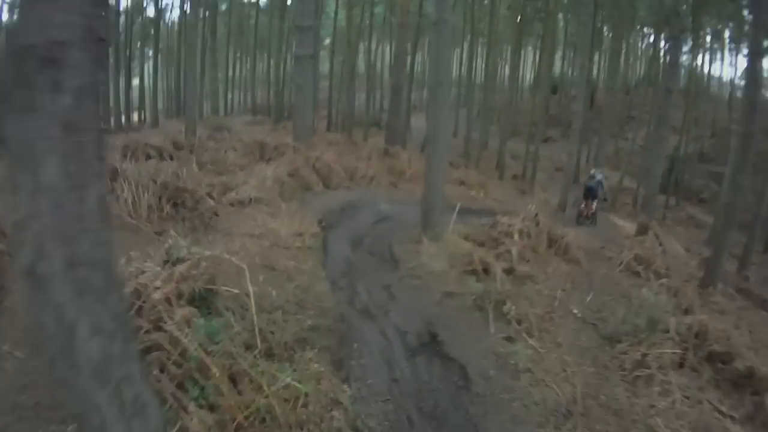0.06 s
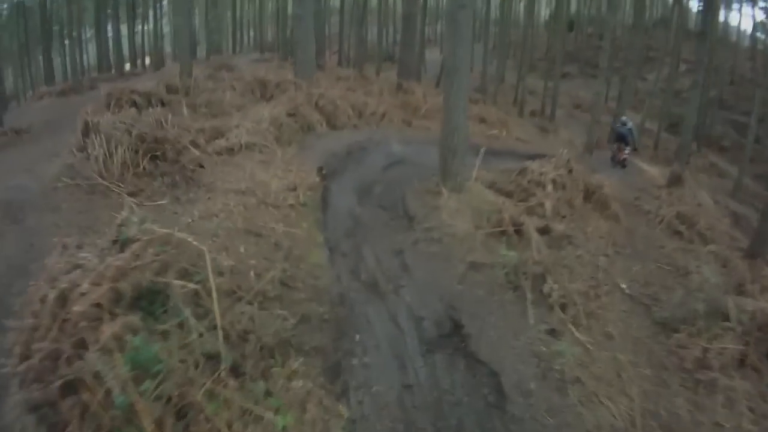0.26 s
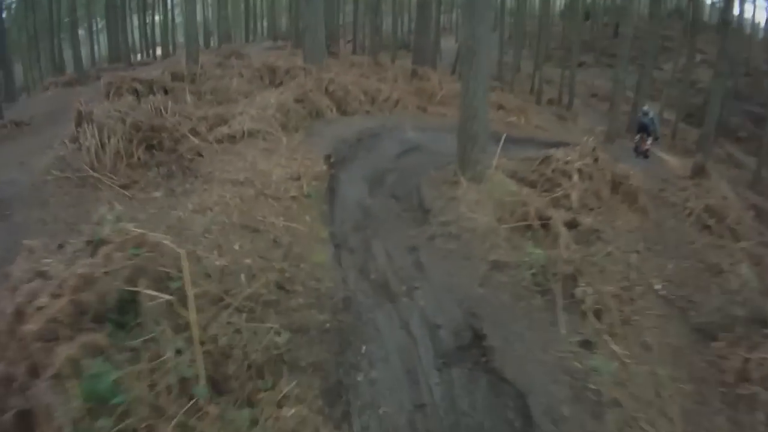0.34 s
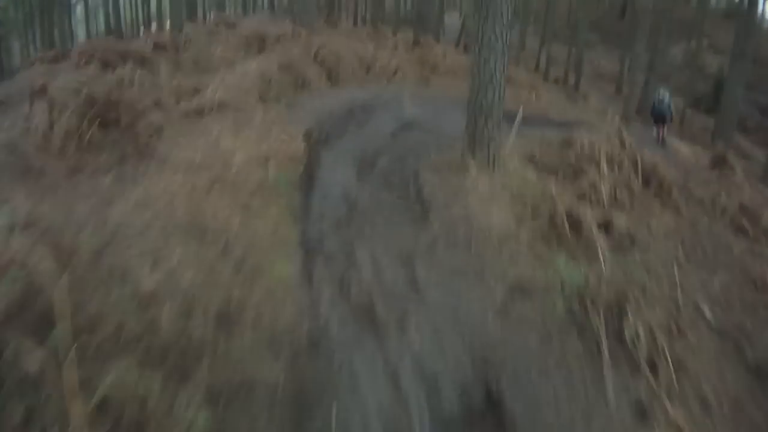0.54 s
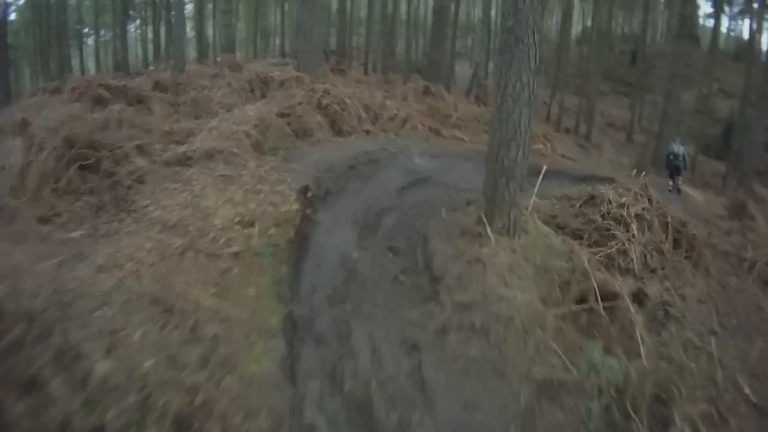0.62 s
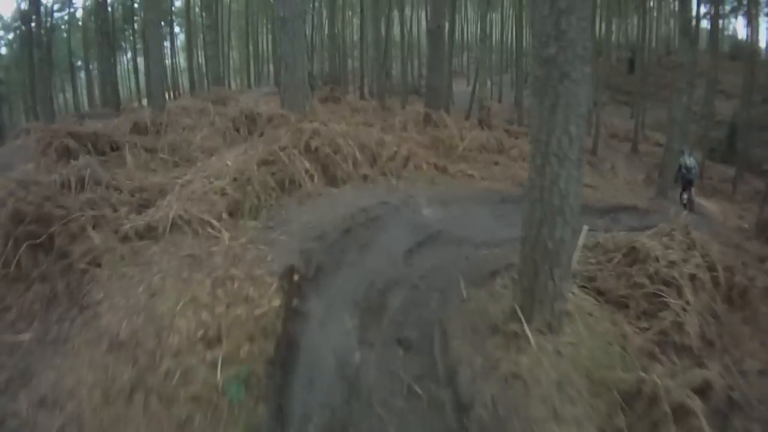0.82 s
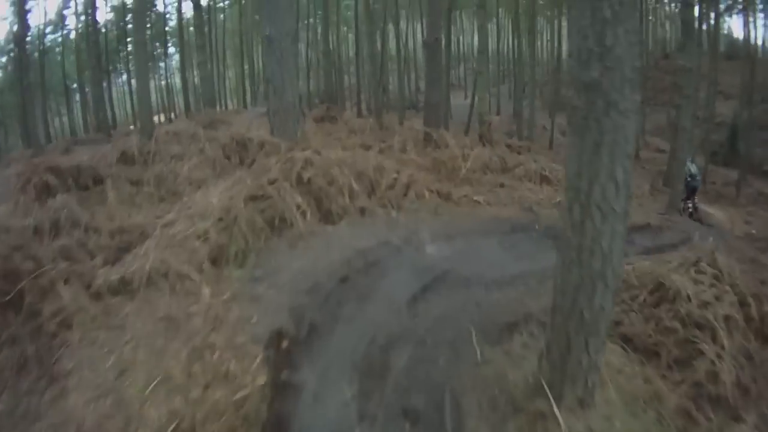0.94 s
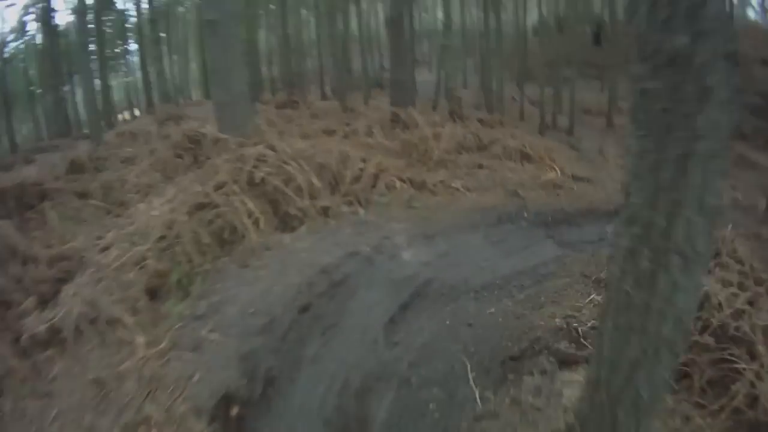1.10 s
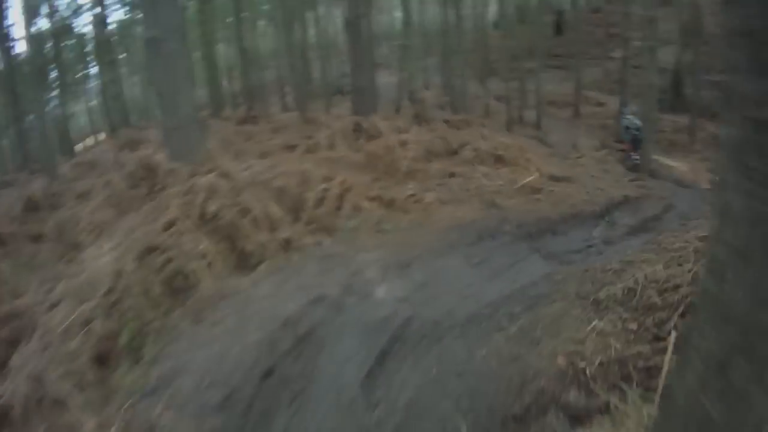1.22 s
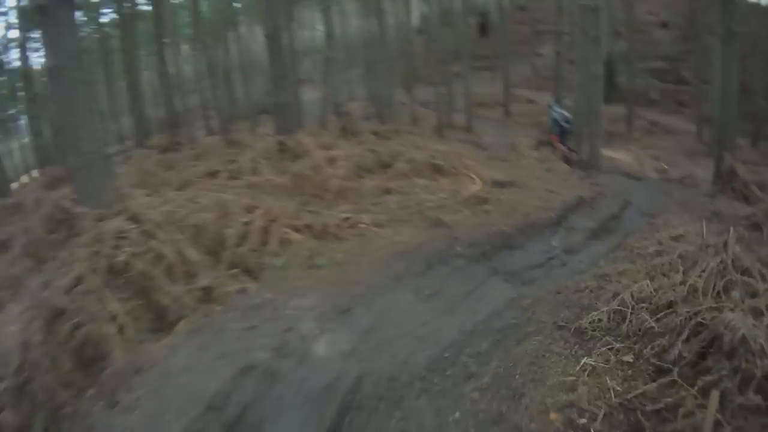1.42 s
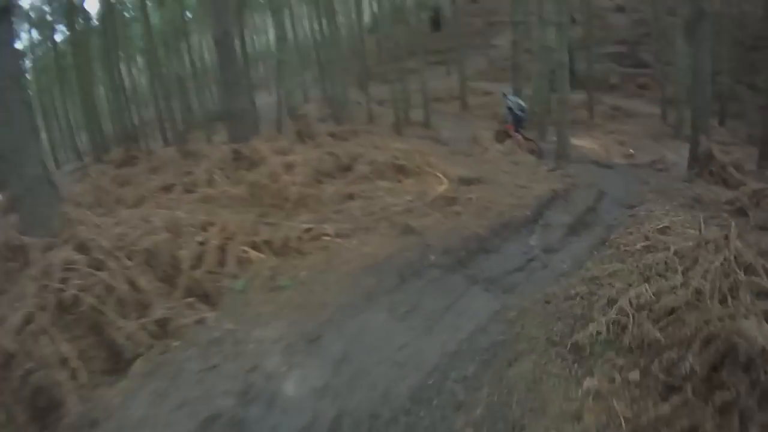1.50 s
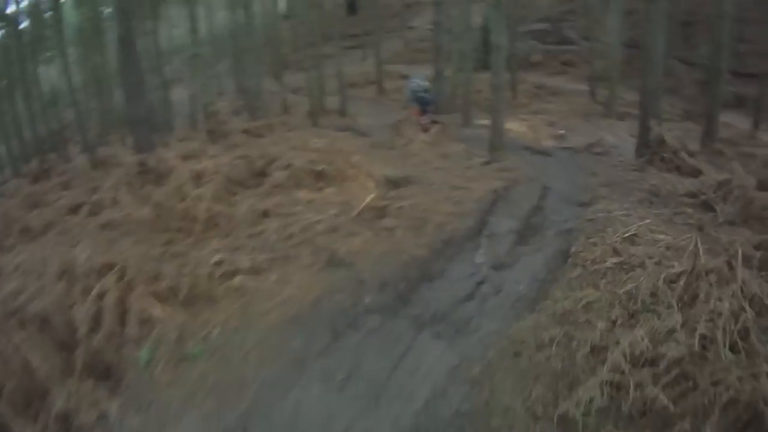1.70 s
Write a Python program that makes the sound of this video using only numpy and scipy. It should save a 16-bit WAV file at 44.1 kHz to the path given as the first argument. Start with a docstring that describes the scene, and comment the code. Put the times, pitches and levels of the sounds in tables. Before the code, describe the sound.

A mountain bike rattles and clacks over a muddy trail, with wind and tyre rumble.

```python
"""A low rumble of wind and tyres, a gritty hiss, then sharp clatter: a mountain bike on a muddy trail.
Bumps knock hard parts together and make them chafe in short rattles. Both sound through one small
hollow body and a thin metal ring; the knocks also draw a dull thud from the frame.
Underneath, gusts buffet, wet ground hisses under the tread and small stones tick."""
import sys
import numpy as np
from scipy import signal
from scipy.io import wavfile

SR = 44100
rng = np.random.default_rng(int(sys.argv[2]) if len(sys.argv) > 2 else 0)


def inscribe(sig):
    """Save sig as 16-bit PCM at rate SR to the path in sys.argv[1].

    A 1-D sig is mono; a 2-D sig holds one channel per row.
    Samples are clipped to [-1, 1] before scaling.
    """
    pcm = np.round(np.clip(np.atleast_2d(sig).T, -1, 1) * 32767)
    wavfile.write(sys.argv[1], SR, pcm.astype(np.int16))


N = 77175
T = np.arange(N) / SR


def from_db(db):
    """Decibels to gain."""
    return 10 ** (np.asarray(db) / 20)


def unit_rms(x):
    """Scale to unit power."""
    return x / np.sqrt(np.mean(x ** 2) + 1e-20)


def envelope(rows):
    """Gain over time from rows of t/s, level/dB."""
    return from_db(np.interp(T, *np.transpose(rows)))


def butter(x, hz, kind, order=2):
    """Causal Butterworth filter."""
    sos = signal.butter(order, np.clip(hz, 10, .49 * SR), kind, fs=SR, output="sos")
    return signal.sosfilt(sos, x)


def drift(corner_hz):
    """Slow random wander, unit RMS."""
    hop, settle = 40, 2000
    pole = np.exp(-2 * np.pi * corner_hz * hop / SR)
    white = rng.standard_normal(N // hop + settle + 2)
    slow = signal.lfilter([1], [1, -2 * pole, pole * pole], white)[settle:]
    return np.interp(np.arange(N) / hop, np.arange(len(slow)), unit_rms(slow))


def band_noise(spectrum, flutter_db):
    """Noise in roughly third-octave bands, each fluttering on its own; unit RMS."""
    hz, db = np.transpose(spectrum)
    edges_hz = np.geomspace(hz[0], hz[-1], int(3 * np.log2(hz[-1] / hz[0]) + 1))
    white = rng.standard_normal((2, N))
    out = np.zeros(N)
    for k, (low, high) in enumerate(zip(edges_hz, edges_hz[1:])):
        band_db = np.interp(np.log(low * high) / 2, np.log(hz), db)
        gain = from_db(band_db + flutter_db * drift(corner_hz=16))
        out += gain * butter(white[k % 2], [low, high], "band")
    return unit_rms(out)


def clicks(per_s, spread_db, size=N):
    """Random tiny contacts of uneven strength, unit RMS."""
    strength = from_db(spread_db * np.minimum(rng.exponential(1, size), 4))
    sign = rng.choice([-1, 1], size)
    hits = rng.random(size) < per_s / SR
    return unit_rms(strength * sign * hits)


def ring(force, modes, bass_db=0, treble_db=0, t60_scale=1):
    """A force rings damped modes; each contact tilts and scatters their levels. Low modes speak late."""
    bass_hz, middle_hz, treble_hz = 1500, 4170, 6940
    max_lag_s, scatter_db = .001, 1.16
    out = np.zeros(len(force))
    for hz, db, t60_s in modes:
        radius = from_db(-60 / (t60_s * t60_scale * SR))
        feedback = [1, -2 * radius * np.cos(2 * np.pi * hz / SR), radius * radius]
        tone = signal.lfilter([.5, 0, -.5], feedback, force + 1e-18)
        tone = butter(tone, 1.59 * hz, "low")  # softens the onset
        tilt_db = np.interp(np.log(hz), np.log([bass_hz, middle_hz, treble_hz]), [bass_db, 0, treble_db])
        gain = from_db(db + tilt_db + scatter_db * rng.standard_normal())
        lag = int(SR * max_lag_s * min(bass_hz / hz, 1))
        out[lag:] += gain * tone[:len(force) - lag]
    return out


# Wind and tyre roar: t/s, level/dB
ROAR_LEVEL = [(0, -36), (.04, -37.5), (.10, -41.5), (.16, -35), (.215, -42.5), (.29, -34), (.44, -34),
              (.54, -37.5), (.62, -36.5), (.72, -36.5), (.77, -39.5), (.84, -37), (.95, -44.5), (1.04, -40),
              (1.15, -40.5), (1.28, -41.5), (1.44, -37), (1.58, -40.5), (1.67, -47.5), (1.75, -50.5)]
# Roar spectrum: f/Hz, relative density/dB
ROAR_SPECTRUM = [(130, -16.5), (190, -4), (260, 0.5), (390, 1.5), (500, -2.5), (630, -8.5), (800, -13),
                 (1000, -23), (1300, -32.5)]
# Wind buffeting: t/s, level/dB
GUST_LEVEL = [(0, -47.5), (.12, -47.5), (.22, -48), (.36, -48.5), (.48, -46.5), (.62, -47.5), (.74, -53),
              (.86, -57.5), (1.05, -51.5), (1.12, -49), (1.165, -45), (1.22, -51.5), (1.38, -52.5),
              (1.52, -54), (1.62, -54), (1.75, -66)]
# Gust spectrum: f/Hz, relative density/dB
GUST_SPECTRUM = [(22, -20.5), (40, -12), (65, -3.5), (120, 1), (170, 0), (220, -10.5)]


def rumble():
    """Rolling tyres and rushing air make a hollow roar; gusts buffet below it."""
    roar = envelope(ROAR_LEVEL) * band_noise(ROAR_SPECTRUM, flutter_db=1)
    gusts = envelope(GUST_LEVEL) * band_noise(GUST_SPECTRUM, flutter_db=1)
    return butter(roar + gusts, 1200, "low")


# Hollow body modes: f/Hz, level/dB, t60/s
BODY_MODES = [(1366, -5.5, 0.019), (1894, -8.5, .018), (2472, -2.5, 0.018), (2731, -6.5, 0.017),
              (3158, 0.5, 0.014), (3538, -9.5, .014), (3948, -1.5, 0.011), (4215, -0.5, .012),
              (4870, -9.5, 0.015), (5580, -19, 0.016), (6347, -13, .007), (7600, -20.5, 0.0073),
              (8810, -21, 0.0062), (9980, -16, 0.0035), (11700, -26.5, 0.0049), (13470, -27, 0.004)]


def hollow_body(force, bass_db=0, treble_db=0, t60_scale=1):
    """A small, well-damped shell turns each contact into a clack."""
    return ring(force, BODY_MODES, bass_db, treble_db, t60_scale)


# Tyres on wet grit: t/s, level/dB
GRIT_LEVEL = [(0, -58), (.10, -59.5), (.17, -53), (.21, -59), (.29, -52.5), (.37, -52), (.46, -44.5),
              (.60, -52.5), (.72, -53.5), (.78, -56.5), (.98, -60.5), (1.16, -56), (1.25, -65.5),
              (1.39, -60), (1.55, -56), (1.68, -66), (1.75, -64)]
# Grit spectrum: f/Hz, relative density/dB
GRIT_SPECTRUM = [(600, 5), (1000, 9), (1400, 7.5), (1750, 2.5), (2500, 3.5), (4200, -5.5), (5500, -15),
                 (8500, -28), (15000, -59.5)]


def grit():
    """Wet ground hisses under the tread and small stones tick."""
    ticks = clicks(per_s=750, spread_db=8.5)
    stones = from_db(-12.5) * unit_rms(hollow_body(ticks, bass_db=7.5))
    ground = band_noise(GRIT_SPECTRUM, flutter_db=2)
    return envelope(GRIT_LEVEL) * (ground + stones)


# Metal modes: f/Hz, level/dB, t60/s
METAL_MODES = [(2368, -38, 0.16), (2885, -26, .075), (4045, -39.5, .06), (4634, -31, .03)]


def metal_ring(force, bass_db=0, treble_db=0):
    """Lightly damped metal leaves a thin ring that outlasts the clack."""
    return ring(force, METAL_MODES, bass_db, treble_db)


# Runs of tiny slips: peak t/s, swell/s, fade/s, level/dB, treble/dB
RATTLE_RUNS = [(0.039, 0.033, .015, -56, 1), (0.366, 0.0064, 0.011, -46.5, 4),
               (0.391, 0.0039, 0.0056, -46, 9), (0.492, .006, 0.0043, -38.5, 8),
               (0.511, 0.012, 0.0083, -24, 1), (0.52, 0.0097, 0.0055, -21.5, -5),
               (0.545, .009, .008, -38, 4), (0.557, 0.019, 0.0063, -27.5, -1),
               (0.582, 0.016, 0.013, -45.5, 1), (0.654, 0.02, 0.0075, -63, -8),
               (0.676, 0.0077, 0.011, -49, 9), (0.698, 0.017, .012, -38, -15),
               (0.722, 0.0025, 0.003, -32.5, -11), (0.734, 0.007, 0.0061, -39.5, -16),
               (0.918, 0.017, 0.017, -52.5, -1), (1.486, 0.0065, .007, -44, -5),
               (1.504, 0.0064, 0.0074, -53, 0), (1.537, .014, 0.0073, -42, -17),
               (1.556, .006, 0.0052, -40.5, -7), (1.627, .010, 0.028, -60, -2),
               (1.724, 0.0067, 0.0067, -53.5, 2)]


def rattles():
    """Parts chafe: dense slips rise 20 dB over the swell time and drop 20 dB over the fade time."""
    bass_db = 10
    out = np.zeros(2 * N)
    for peak_s, swell_s, fade_s, db, treble_db in RATTLE_RUNS:
        span = max(int(peak_s * SR) - SR // 20, 0) + np.arange(SR // 5)
        t = span / SR - peak_s
        effort = from_db(db - 20 * np.maximum(-t / swell_s, t / fade_s) ** 1.53)
        slips = clicks(per_s=4000, spread_db=2, size=len(t))
        force = slips * effort
        steady = hollow_body(slips, bass_db, treble_db) + metal_ring(slips, bass_db, treble_db)
        rattle = hollow_body(force, bass_db, treble_db) + metal_ring(force, bass_db, treble_db)
        out[span] += rattle / steady.std()
    return butter(out[:N], 590, "high")


# Frame thud modes: f/Hz, level/dB, t60/s
FRAME_MODES = [(310, -13.5, .045), (568.5, -7, 0.024), (793, -9, 0.025), (1087, -11.5, .02)]
# Blows between hard parts: t/s, level/dB, bass/dB, treble/dB, chatter/dB, thud/dB, body t60 scale
BLOWS = [(0.1188, -25, -9, 5.5, -15, -30, 0.75), (0.1530, -53.5, 13, -10, -24, -20, 1.0),
         (0.2302, -1.5, -8, 12.5, -26, -18, 0.88), (0.2404, -30.5, 10.5, -10, -15, -16, 1.0),
         (0.4816, -12.5, -8, -7, -28, -20, 0.62), (0.5021, -29, -4, -6, -15, -8, 0.64),
         (0.5089, -14, -9, -10, -19, -16, 1), (0.5192, -21.5, -1, -2, -11.5, -20, 1.0),
         (0.652, -50, 18.5, -19.5, -4.5, -17, 1.6), (1.0577, -36, 23, 8, -17, -7, 1.0),
         (1.0631, -13, -4.5, -13, -13.5, -3, 0.88), (1.1356, -10.5, -5, -2, -21, -16, 0.79),
         (1.2955, -62.5, 6, 3, -8.5, -20, 1.0), (1.3443, -47.5, 17.5, -8, -12, -21.5, 0.86),
         (1.4280, -23, 4, -2, -13, -10, 1), (1.4306, -28, 3, 3, -17.5, -13, 0.82),
         (1.472, -28.5, 3.5, 0, -16, -9, 1.0), (1.475, -36, 16.5, -18, -21, -16, 1.2),
         (1.5339, -39, 5, -12, -8, -28, 1.25), (1.5882, -28, 6, -14, -20.5, -19.5, 0.81),
         (1.594, -52.5, 19, -8, -6, -12, 1.0), (1.6186, -52, 13, -3, -17, -12, 1.0)]


def knocks():
    """Each blow, one sharp contact and a fast-dying chatter, rings the body, the metal and the frame."""
    chatter_t60_s = .024
    t = T[:SR // 5]
    decay = from_db(-60 * t / chatter_t60_s)
    out = np.zeros(2 * N)
    for start_s, db, bass_db, treble_db, chatter_db, thud_db, t60_scale in BLOWS:
        chatter = decay * clicks(per_s=6100, spread_db=2, size=len(t))
        force = 2 * from_db(chatter_db) * chatter / np.linalg.norm(chatter)
        force[0] += 1  # the sharp contact
        clack = hollow_body(force, bass_db, treble_db, t60_scale)
        ping = metal_ring(force)
        thud = from_db(thud_db) * ring(force, FRAME_MODES)
        start = int(start_s * SR)
        out[start:start + len(t)] += from_db(db) * (clack + ping + thud)
    return out[:N]


def scene():
    """Nearly mono: only the clatter and the top of a faint steady hiss have a trace of width."""
    side_lag_s = .004
    clatter = knocks() + rattles()
    hiss = rng.standard_normal((2, N))
    middle = from_db(-70.5) * hiss[0] + rumble() + grit() + clatter
    late_clatter = np.roll(clatter, int(side_lag_s * SR))
    side = from_db(-29) * butter(late_clatter, [2400, 8000], "band")
    side += from_db(-78) * butter(hiss[1], 6000, "high", order=4)
    return np.array([middle + side, middle - side])


def record(dry):
    """Soft clip, then a steep low-pass."""
    cutoff_hz = 15400
    lowpass = signal.ellip(10, .2, 80, cutoff_hz, fs=SR, output="sos")
    return signal.sosfilt(lowpass, np.tanh(dry))


dry = scene()
out = record(dry)
inscribe(out)
```